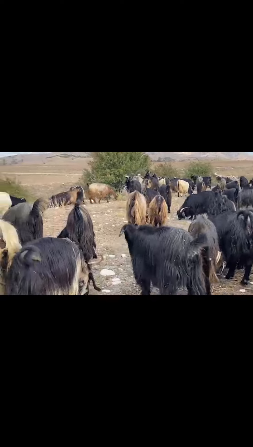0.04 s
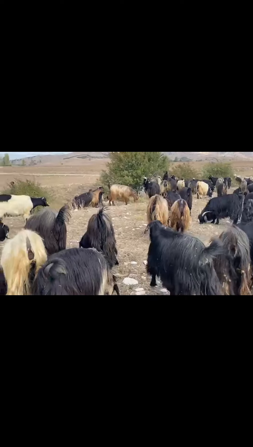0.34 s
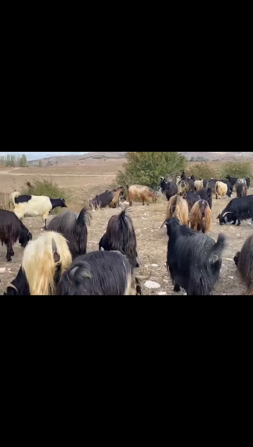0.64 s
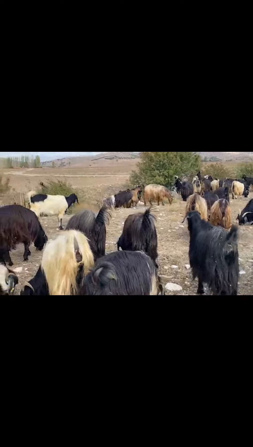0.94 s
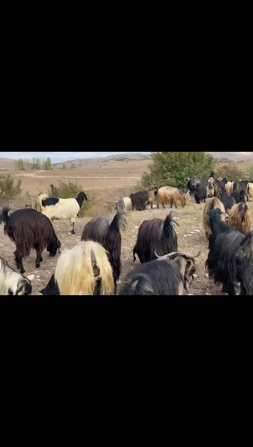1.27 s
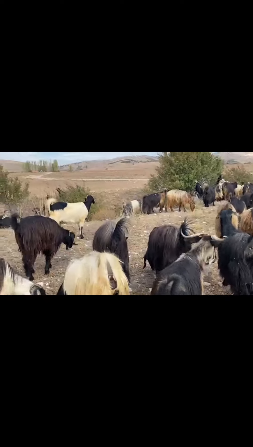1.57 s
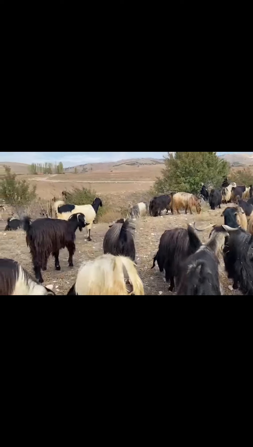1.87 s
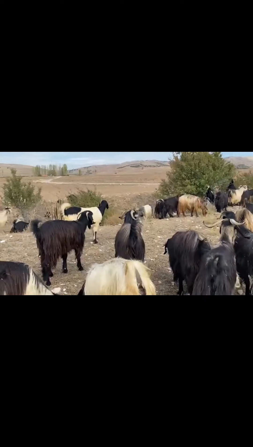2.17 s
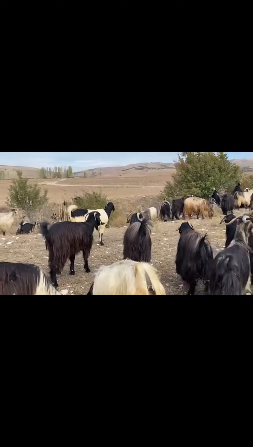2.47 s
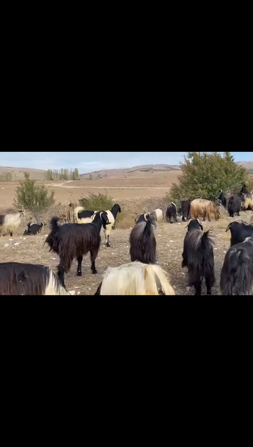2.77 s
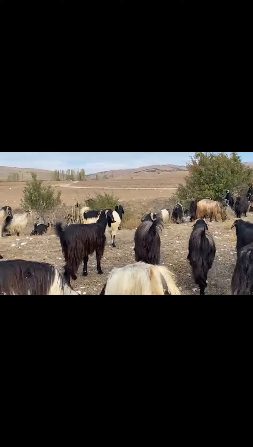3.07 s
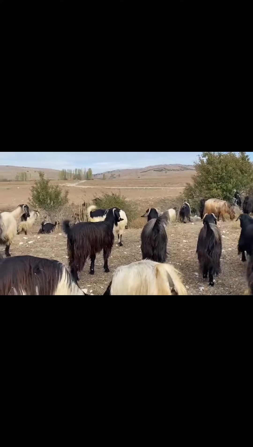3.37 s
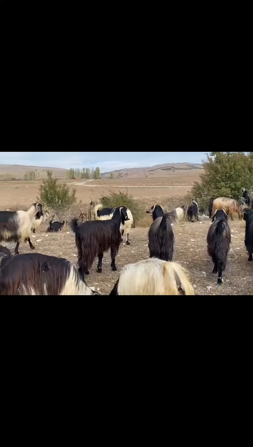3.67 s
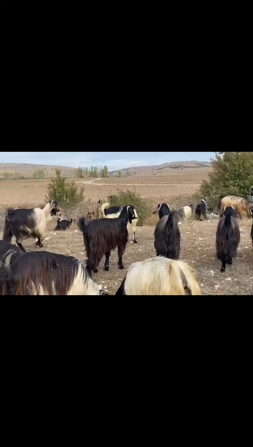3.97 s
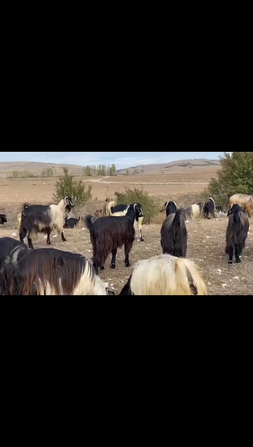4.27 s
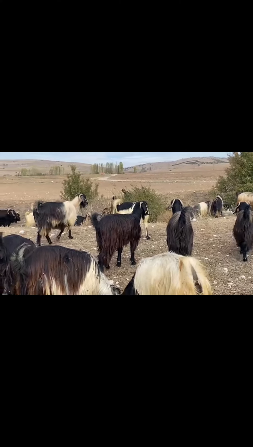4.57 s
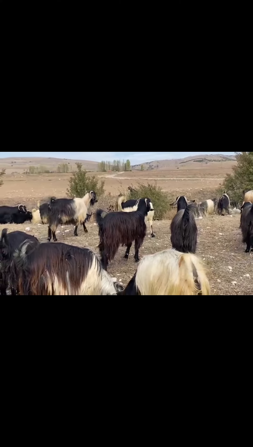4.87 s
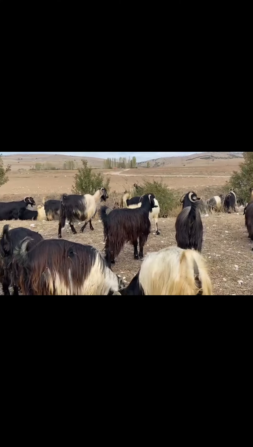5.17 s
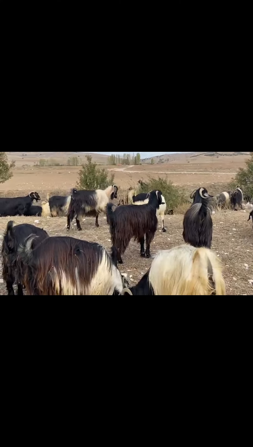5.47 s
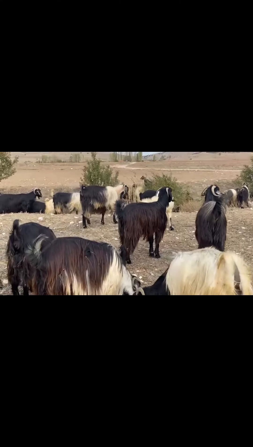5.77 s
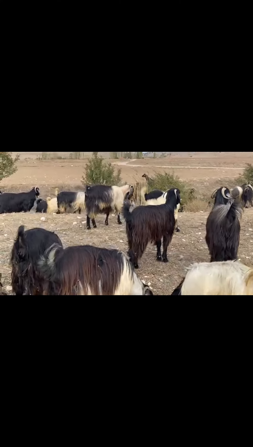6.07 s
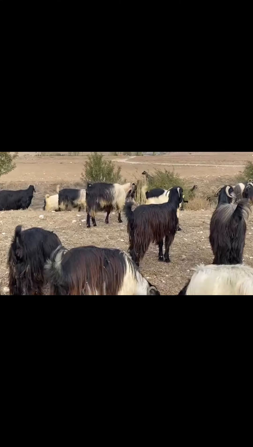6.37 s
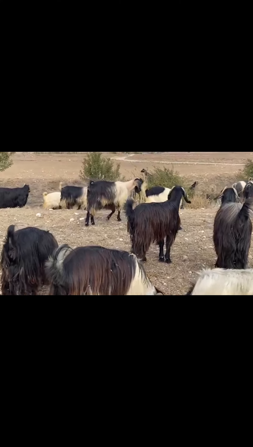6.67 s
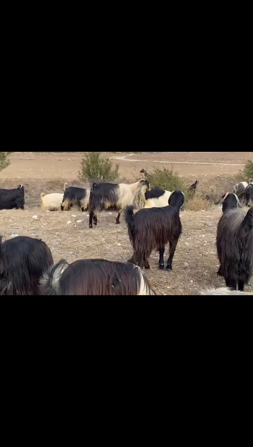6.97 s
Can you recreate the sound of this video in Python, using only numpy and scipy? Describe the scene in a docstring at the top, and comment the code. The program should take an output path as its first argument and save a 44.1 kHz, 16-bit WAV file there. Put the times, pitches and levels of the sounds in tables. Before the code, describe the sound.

From the first moment a goat's sheet-metal bell clonks close by, mostly to the left, each uneven strike a bright tick and a short hollow note that leaves a thin ring. Underneath, hooves thud softly on soil, twigs and stones crack, and legs drag through dry stalks. Low puffs of wind rumble on the microphone throughout, and small bells tinkle very faintly far to the right. Three faint pips come between about 2.4 and 3 seconds, with a sharp twig snap just before 3. After a strong clonk at about 3.3 seconds the bell thins to a few sparse strikes. Around 5.6 seconds one strong gust hits the microphone, together with the heaviest hoof thump and the loudest snap. From 5.8 seconds the bell picks up again, ending on a bright strike at about 7 seconds. The pasture is open and free of echo.

```python
"""Goats graze on dry, stony pasture. From the first moment a clapper clonks in the sheet-metal bell of a
walking goat, while hooves thud, snap twigs and crunch through stalks. Wind puffs on the microphone and
far bells tinkle. Faint pips come between 2 and 3 s, then the near bell thins out. Around 5.6 s one
strong gust hits, with the heaviest hoof and the loudest snap, and the bell picks up again to the end."""
import sys
import numpy as np
from scipy import signal
from scipy.fft import rfft, irfft, next_fast_len
from scipy.io import wavfile
from scipy.ndimage import uniform_filter1d, map_coordinates

SR = 44100
rng = np.random.default_rng(int(sys.argv[2]) if len(sys.argv) > 2 else 0)


def log_audio(samples):
    """Write samples as a 16-bit WAV file to the path given in sys.argv[1]."""
    # one column per channel
    frames = np.atleast_2d(samples).T
    # limit to full scale, then quantise
    limited = np.clip(frames, -1, 1)
    pcm = np.round(limited * 32767).astype(np.int16)
    wavfile.write(sys.argv[1], SR, pcm)


N = 313551

# Clapper hits; the spot struck sets how strongly each mode family rings. Each row: start in seconds,
# clonk t60 in seconds, pan in dB (plus is left), the twin's starting phase in radians, then levels in dB
# of families 0-9: clonk, hum, ring, ring's twin, shimmer, low shimmer, ting, clink, ping, sparkle.
CLAPPER_HITS = [(0.0, 0.25, 5, 3.5, -19, -33, -41.5, -47, -47, -48.5, -60, -37, -56, -32.5),
                (0.035, 0.21, -3, -2, -70, -70, -73, -75, -75, -75, -75, -33.5, -53, -60.5),
                (0.211, 0.4, 1.5, 1.2, -36, -32, -43.5, -46.5, -45.5, -73, -43.5, -59, -58, -60),
                (0.339, 0.25, -1.0, 0.5, -32.5, -41.5, -41, -54, -52, -49.5, -59, -54, -66, -51.5),
                (0.487, 0.34, 5.5, -1.35, -31.5, -46.5, -48, -52, -71, -56, -67, -63, -74, -58),
                (0.857, 0.63, 4, 2.5, -41, -36, -50, -55.5, -46, -48.5, -58, -47, -45.5, -53),
                (1.068, 0.25, 5.5, 2, -38.5, -47.5, -46, -50, -52, -55, -51, -72, -72, -62),
                (1.34, 0.55, 7, 1.4, -33.5, -45, -39, -47, -43, -72, -57, -49, -40.5, -44),
                (1.704, 0.25, 5, 0, -65, -47, -56, -62, -49.5, -52, -56, -49, -61, -57),
                (2.296, 0.49, 6, -1.6, -29.5, -58, -38.5, -47.5, -46, -56, -55, -47, -53, -47),
                (2.469, 0.23, 7.5, 0, -27, -58, -52.5, -58, -52, -67, -57, -49.5, -61, -55),
                (2.659, 0.54, 3.5, -2.5, -38, -60.5, -52, -56, -63, -62, -72, -58, -72, -63),
                (3.091, 0.32, 11.0, 3.5, -26.5, -59, -46, -58, -62.5, -79, -72, -71, -71, -71),
                (3.235, 0.38, 8.0, -2, -33.5, -60, -62, -63, -72, -72, -53, -64, -72, -65),
                (3.346, 0.34, 8, -2, -19.5, -36, -52, -54.5, -62.5, -61, -63, -50, -72, -58),
                (4.437, 0.33, 7, -2.5, -55.5, -40.5, -52.5, -68, -54.5, -81, -71, -70, -73, -64),
                (5.027, 0.41, 25, 3.5, -31.5, -66, -60, -76, -69, -79, -72, -68, -62, -65),
                (5.403, 0.7, 15, -1, -51, -49, -65, -76, -76, -76, -75, -72, -78, -77),
                (5.815, 0.37, 7.5, -2.6, -38, -42, -53.5, -67, -69, -61, -55, -58, -63, -53),
                (6.152, 0.47, 10.0, 2.2, -39, -54, -61.5, -63, -58, -67, -56, -60, -64, -60),
                (6.267, 0.55, 5.5, -2, -35, -40.5, -47, -61, -65, -55.5, -59.5, -62, -57, -57),
                (6.666, 0.46, 8, -1.5, -44.5, -40, -55.5, -62, -50, -51, -43, -47, -54, -49),
                (7.048, 0.23, 1, 0, -25.5, -46, -41, -47.5, -43, -47.5, -41, -32.5, -50.5, -38)]
# Modes of the bell wall; close pairs beat as they fade.
# Each row: family number, pitch in Hz, level trim in dB, t60 in seconds, pan in dB.
WALL_MODES = [(1, 1555, 0, 1.6, 1.5), (2, 3378, 0, 3.3, 1), (3, 3385.6, 0, 3.3, -1), (4, 6022, 0, 1.35, 0),
              (5, 5936, 0, 1.35, -3), (6, 6487, 0, .3, 4), (7, 7272, 1, .24, -1), (7, 6932, -7, .3, -1),
              (8, 7704, -1, .36, 10), (8, 10078, -1, .3, -8), (9, 7900, 1, .19, 1), (9, 10466, -5, .25, -7),
              (9, 9430, -3, .33, -8)]
HUM, TWIN = 1, 3   # family numbers
# The bell sways on the neck. Each row: time in seconds, clonk pitch in Hz, left-side lag in radians.
BELL_SWAY = [(0, 1493, 0.71), (.5, 1489, 1), (1.4, 1490, 0.86), (2.4, 1484, 0.4), (3.2, 1485, 0.67),
             (4.44, 1490, 1.1), (5.03, 1486, 3), (5.8, 1492, 3.8), (6.2, 1493, 1.17), (6.67, 1487, 3.85),
             (7.051, 1498, 1.93)]
# The hum swells and dips as the bell turns. Each row: time in seconds, gain in dB.
HUM_RIDE = [(.5, -3.5), (.87, -6.5), (1, 2.5), (1.1, -1.5), (1.18, -7), (1.28, 4), (1.45, 13.5), (1.87, 3),
            (2.06, 7.5), (2.2, -10), (2.3, 10.5), (2.73, -1), (2.88, 17), (3.62, -7), (3.98, -7.5),
            (4.2, 0.5), (4.75, -14), (5.7, -3.5), (6.67, -4), (6.95, 5.5)]
# Hooves on soil and stone.
# Each row: start in seconds, level in dB, thump pitch in Hz, grit against the thump in dB.
HOOF_FALLS = [(.404, -36, 181, -34), (.619, -47, 396, -4), (1.105, -37.5, 172, -6.5),
              (1.708, -40.5, 340, -7.5), (2.042, -40, 179, -18), (2.604, -44.5, 272, -10),
              (3.59, -45, 149.9, -11.5), (3.916, -37, 185, -22.5), (4.968, -45.5, 450, -6),
              (5.655, -25.5, 146, -42), (6.032, -44, 238, -20)]
# Twigs and stones cracking underfoot. Each row: start in seconds, relative peak in dB, tone in Hz.
CRACKS = [(.623, -36, 1900), (.841, -31, 4000), (1.025, -36.5, 850), (1.779, -33.5, 2600),
          (2.105, -35.5, 6000), (2.606, -42, 3000), (2.866, -33.5, 5000), (2.953, -22.5, 4470),
          (3.484, -38, 4500), (3.809, -36, 7600), (3.988, -44, 5200), (4.352, -41, 3850),
          (4.837, -46, 1700), (4.935, -34.5, 1360), (4.965, -37, 2640), (5.217, -39, 4600),
          (5.326, -35.5, 6200), (5.498, -31, 3630), (5.572, -28.5, 6750), (5.733, -33, 940),
          (5.737, -21, 9900), (5.893, -36, 900), (5.978, -38, 1000), (6.330, -37.5, 2200),
          (6.645, -29, 8000), (6.9, -31, 3740)]
# A nearby leg drags through stubble.
# Each row: crest time in seconds, fade in seconds, relative stalk and soil levels in dB.
LEG_DRAGS = [(0, 0.017, -53, -48.5), (.32, 0.032, -57, -68), (.55, 0.12, -70, -63),
             (1.02, 0.046, -58.5, -59), (1.12, 0.078, -66, -58.5), (1.5, 0.027, -56, -73),
             (1.72, 0.091, -58, -56), (2.6, 0.027, -56, -68), (3.81, 0.03, -60.5, -60.5),
             (4.755, 0.039, -54.5, -52.5), (4.97, 0.011, -61, -51.5), (5.59, 0.097, -61, -60),
             (6.615, 0.035, -51.5, -59.5), (6.76, 0.16, -62.5, -59.5), (7.06, 0.039, -61, -78)]
# The herd's bed of rustle. Each row: time in seconds, relative stalk and soil levels in dB.
HERD_BED = [(0, -63.5, -65.5), (1.1, -61.5, -62), (2.4, -62, -64.5), (3.3, -65, -66), (4.5, -65, -66),
            (5.5, -64.5, -63.5), (6.3, -65.5, -63), (7.1, -60.5, -66)]
# EQ curves for crisp stalks and dull soil. Each row: frequency in Hz, gain in dB.
STALK_EQ = [(900, -18), (1500, -8.5), (2100, 0.5), (3000, -2), (4800, 0), (7000, 0.5), (9000, -0.5),
            (11950, -2)]
SOIL_EQ = [(180, -2.5), (380, 1.5), (750, -5.5), (1200, -7.5), (2000, -11.5), (3500, -38)]
# Wind puffs on the microphone.
# Each row: crest time in seconds, fade in seconds, relative rumble and turbulence levels in dB.
WIND_PUFFS = [(.46, 0.035, -40, -58), (.7, 0.053, -46.5, -62), (.825, 0.028, -36.5, -50),
              (1.0, 0.066, -38.5, -49.5), (1.255, 0.033, -43.5, -54), (1.38, 0.038, -44.5, -60),
              (1.81, 0.11, -52, -56.5), (2.05, 0.05, -43.5, -47.5), (2.87, 0.049, -47, -61),
              (3.14, 0.069, -46, -65), (3.59, 0.095, -42, -60), (3.74, 0.053, -52, -51.5),
              (4.49, 0.084, -45.5, -59.5), (4.72, 0.073, -39, -47), (5.13, 0.073, -41.5, -68),
              (5.49, 0.1, -31, -49.5), (5.655, 0.1, -27.5, -34.5), (6.03, 0.031, -40, -51.5),
              (6.47, 0.054, -43, -52.5), (6.61, 0.081, -44.5, -47.5)]
# The breeze between puffs. Each row: time in seconds, relative rumble and turbulence levels in dB.
BREEZE_BED = [(0, -65, -61.5), (.3, -59.5, -63), (1.1, -53.5, -61), (1.7, -53.5, -62), (2.28, -60, -76),
              (2.8, -61, -73), (3.4, -54, -61.5), (4.2, -53, -64.5), (5.3, -54.5, -61), (5.9, -47, -53),
              (6.12, -59.5, -64), (6.36, -63.5, -69), (6.8, -53.5, -58.5)]
# EQ curves for large and small eddies. Each row: frequency in Hz, gain in dB.
RUMBLE_EQ = [(15, -37), (28, -24), (42, -4), (68, 0.5), (100, -3.5), (140, -14), (220, -42)]
TURBULENCE_EQ = [(80, -15.5), (130, -4.5), (180, -5), (235, -9.5), (330, -18), (800, -54)]
# Distant pips. Each entry is a start in seconds.
PIP_STARTS = [2.922, 2.4, 3.035]
# Sound from below reaches the two microphone ports out of step.
# Each row: frequency in Hz, phase shift of the left port in radians.
PORT_SHIFT = [(7500, 0), (7950, 0), (8400, -np.pi), (9550, -np.pi), (10050, -5), (10450, -2 * np.pi)]


def goat_bell(clonk_rise_s=.0019, rise_cycles=3, detune_hz=.29, aim_db=3, graze_s=.06, rebound_s=.11):
    """Each clapper hit knocks, sounds a short clonk in the bell's air and leaves the wall ringing."""
    clonk, knocks = np.zeros((2, 2, N))
    walls = np.zeros((len(WALL_MODES), 2, N))
    starts = [hit[0] for hit in CLAPPER_HITS]
    pauses = np.diff(starts, prepend=-1)
    sway_s, sway_hz, sway_lag = np.transpose(BELL_SWAY)
    for (start, clonk_t60, pan_db, twin_phase, *family_db), pause in zip(CLAPPER_HITS, pauses):
        # the next hit chokes the ring, unless it is only a quick graze
        free_s = min([later for later in starts if later > start + graze_s] + [N / SR]) - start
        clonk_hz = np.interp(start, sway_s, sway_hz)
        lag = np.interp(start, sway_s, sway_lag)
        air_tone = partial(clonk_hz, clonk_t60, free_s, clonk_rise_s, lag)
        add(clonk, start, from_db(family_db[0]) * panned(pan_db) * air_tone)
        for wall, (family, hz, trim_db, t60, side_db) in zip(walls, WALL_MODES):
            scatter_db, detune, aim, spot = rng.standard_normal(4)
            is_hum = family == HUM
            gain = from_db(family_db[round(family)] + trim_db + scatter_db)
            # the hum follows the clonk's pan; overtones beam anywhere
            pan = panned(side_db + (pan_db if is_hum else aim_db * aim))
            phase = (family == TWIN) * twin_phase + .18 * spot
            tone = partial(hz + detune_hz * detune, t60, free_s, rise_cycles / hz, is_hum * lag, phase)
            add(wall, start, gain * pan * tone)
        force = np.linalg.norm(from_db(family_db[2:]))
        force *= 1 - np.exp(-pause / rebound_s)   # a quick rebound lands softly
        add(knocks, start, from_db(-4) * force * clapper_knock())
    return clonk + through_ports(knocks + bell_turning(walls))


def partial(hz, t60, free_s, rise_s, lag=0., phase=0., choke_s=.011):
    """One bell mode swells, rings freely until free_s, then is choked."""
    t = np.arange(int((free_s + .03) * SR)) / SR
    attack = 1 - np.exp(-t / rise_s)
    decay = from_db(-60 * t / t60)
    choke = np.exp(-np.maximum(t - free_s, 0) / choke_s)
    return attack * decay * choke * np.sin(2 * np.pi * hz * t + phase + np.array([[-lag], [0]]))


def clapper_knock(decay_s=.0038, clack_hz=2400):
    """The clapper's contact: a hard, bright tick and a short clack of sheet metal."""
    t = np.arange(SR // 30) / SR
    decay = np.exp(-t / decay_s)
    tick_noise, clack_noise = rng.standard_normal((2, len(t)))
    tick = band(tick_noise * decay, 940, 11000, order=1)
    clack = rms_one(band(clack_noise, clack_hz / 1.7, clack_hz * 1.52)) * decay
    return tick + from_db(-4) * clack


def bell_turning(walls, depth_db_per_khz=.6469, lobe_cycles=220):
    """Each mode's lobes sweep past as the bell turns: higher overtones flutter faster and deeper."""
    ringing = 0
    for wall, (family, hz, *_) in zip(walls, WALL_MODES):
        if family == HUM:
            lobe_db, = in_time(HUM_RIDE)
        elif family != TWIN:   # the twin shares the flutter of the ring before it
            lobe_db = depth_db_per_khz * hz / 1000 * drift(hz / lobe_cycles)
        ringing = ringing + wall * from_db(lobe_db)
    return ringing


def hooves(attack_s=.00053, decay_cycles=2.23, grit_s=.018):
    """A hoof gives a dead thump, lower and longer on soft soil, and a puff of grit."""
    out, t = np.zeros(N), np.arange(SR // 8) / SR
    for start, db, hz, grit_db in HOOF_FALLS:
        envelope = (1 - np.exp(-t / attack_s)) * np.exp(-t * hz / decay_cycles)
        thump = envelope * np.sin(2 * np.pi * hz * t)
        grit = rms_one(band(rng.standard_normal(len(t)), 230, 1020)) * np.exp(-t / grit_s)
        add(out, start, from_db(db) * (thump + from_db(grit_db) * grit))
    return out


def snaps(gain_db=1, tear_db=-13, tear_s=.0007, splinter_db=-31, splinter_s=.011):
    """One clean break, a brief tearing of fibres, then a faint tail of splinters."""
    out, t = np.zeros(N), np.arange(SR // 20) / SR
    clean_break = 2 * (t == 0)
    tail = from_db(tear_db) * np.exp(-t / tear_s) + from_db(splinter_db) * np.exp(-t / splinter_s)
    for start, db, hz in CRACKS:
        force = clean_break + tail * rng.standard_normal(len(t))
        body = band(force, hz / 1.4, hz * 1.15, order=1)
        crack = band(body, 350, 11900)
        add(out, start, from_db(db + gain_db) * crack / np.abs(crack).max())
    return out


def trampling(stalk_gain_db=7, soil_gain_db=2, edges_hz=(900, 2600, 4600, 7200, 11900)):
    """Thick and thin stalks crackle in their own registers over the herd's rustle; soil scuffs below."""
    drag_power = swell_power(LEG_DRAGS, rise_share=.59)
    stalk_level, soil_level = np.sqrt(drag_power + from_db(in_time(HERD_BED)) ** 2)
    crackle = sum(band(crunch(per_s=1200, size_db=3, clump_db=3.5), low, high)
                  for low, high in zip(edges_hz, edges_hz[1:]))
    rustle = rng.standard_normal(N) * from_db(2 * drift(60))
    stalks = stalk_level * coloured(crackle + from_db(-3) * rustle, STALK_EQ)
    grit = crunch(per_s=600, size_db=3.7, clump_db=3)
    soil = soil_level * coloured(grit + from_db(-4) * wide_noise(side_db=.5), SOIL_EQ)
    return from_db(stalk_gain_db) * through_ports(stalks) + from_db(soil_gain_db) * soil


def crunch(per_s, size_db, clump_db):
    """Many tiny breaks of uneven size, louder in clumps."""
    breaks = rng.random(N) < per_s / SR
    sizes = from_db(size_db * np.minimum(rng.exponential(1, N), 4.5))
    polarity = rng.choice([-1, 1], N)
    return rms_one(breaks * sizes * polarity * from_db(clump_db * drift(70)))


def wind(rumble_gain_db=.5, waver_db=3.5):
    """Puffs ride a wavering breeze. Large eddies press on both ports alike, small ones spread wide."""
    breeze = from_db(np.array(in_time(BREEZE_BED)) + waver_db * drift(12))
    rumble_level, turbulence_level = np.sqrt(swell_power(WIND_PUFFS, rise_share=.83) + breeze ** 2)
    rumble = rumble_level * eddies(RUMBLE_EQ, side_db=-13.5, steady_s=.052)
    turbulence = turbulence_level * eddies(TURBULENCE_EQ, side_db=-3, steady_s=.064)
    return from_db(rumble_gain_db) * rumble + turbulence


def eddies(eq, side_db, steady_s):
    """Swirls of air pressure, levelled so that the wind alone shapes their swell."""
    swirl = coloured(wide_noise(side_db), eq)
    power = uniform_filter1d(np.mean(swirl ** 2, axis=0), int(steady_s * SR))
    return swirl / np.sqrt(power + 1e-6)


def far_bells(level_db=-64, t60=.74, count=22):
    """Small bells deeper in the herd tinkle at random, off to the right."""
    out = np.zeros((2, N))
    for when, pitch, softness in rng.random((count, 3)):
        tone = partial(1920 + 220 * pitch, t60, free_s=t60, rise_s=.0022)
        add(out, when * N / SR, from_db(level_db - 2.1 * softness) * panned(-20) * tone)
    return out


def pips(level_db=-54, pitch_hz=2020, length_s=.015):
    """Faint distant pips, perhaps a bird: each a soft-edged blip of sine."""
    out, t = np.zeros(N), np.arange(int(length_s * SR)) / SR
    for start in PIP_STARTS:
        add(out, start, np.hanning(len(t)) * np.sin(2 * np.pi * pitch_hz * t))
    return from_db(level_db) * out


def through_ports(x):
    """In the high treble the two microphone ports hear nearby sounds out of step."""
    size = next_fast_len(N + 4096)
    phase = np.interp(np.fft.rfftfreq(size, 1 / SR), *np.transpose(PORT_SHIFT))
    left_shift = np.exp(1j * phase * np.array([[1], [0]]))
    return irfft(rfft(x, size) * left_shift, size)[:, :N]


def swell_power(rows, rise_share, steepness=1.2):
    """Round-topped swells, one power curve per level column; the rise lasts rise_share of the fade."""
    power = 0
    for crest_s, fade_s, *levels_db in rows:
        t = np.arange(N) / SR - crest_s
        from_crest = np.maximum(t, -t / rise_share) / fade_s
        envelope = np.exp(-np.minimum(from_crest ** steepness, 20))
        power = power + np.outer(from_db(levels_db), envelope) ** 2
    return power


def drift(per_s):
    """A smooth random wobble of spread near 1, through per_s points a second."""
    knots = rng.standard_normal(int(N / SR * per_s) + 4)
    fine = map_coordinates(knots, [np.arange(len(knots) * 10) / 10], order=2, mode="nearest")
    return np.interp(np.arange(N) / SR * per_s * 10, np.arange(len(fine)), fine)


def coloured(x, eq):
    """Shape x with an EQ curve, at unit power."""
    hz, db = np.transpose(eq)
    size = next_fast_len(N + 4096)
    log_hz = np.log(np.fft.rfftfreq(size, 1 / SR) + 1)
    gain = from_db(np.interp(log_hz, np.log(hz), db, left=-80, right=-80))
    return rms_one(irfft(rfft(x, size) * gain, size)[..., :N])


def band(x, low_hz, high_hz, order=2):
    """Causal band-pass."""
    sos = signal.butter(order, [low_hz, min(high_hz, .45 * SR)], "band", fs=SR, output="sos")
    return signal.sosfilt(sos, x)


def wide_noise(side_db):
    """White stereo noise whose side level sets its width."""
    mid, side = rng.standard_normal((2, N))
    return mid + from_db(side_db) * side * np.array([[1], [-1]])


def panned(db):
    """Left and right gains of unit mean power; plus is left."""
    return rms_one(from_db([[db / 2], [-db / 2]]))


def in_time(rows):
    """Draw each column of timed breakpoints as an automation curve."""
    times, *columns = np.transpose(rows)
    return [np.interp(np.arange(N) / SR, times, column) for column in columns]


def add(out, start_s, sound):
    """Mix a sound in at its cue."""
    at = int(np.clip(round(start_s * SR), 0, N - 1))
    out[..., at:at + sound.shape[-1]] += sound[..., :N - at]


def from_db(db):
    """Decibels to gain."""
    return 10 ** (np.asarray(db) / 20)


def rms_one(x):
    """Scale to unit power."""
    return x / np.sqrt(np.mean(x ** 2) + 1e-20)


def scene():
    """Open ground: every layer arrives without reverb."""
    return goat_bell() + hooves() + through_ports(snaps()) + trampling() + wind() + far_bells() + pips()


def record(dry):
    """A steep low-pass takes off the top above 11.9 kHz."""
    return signal.sosfilt(signal.ellip(10, .2, 70, 11900, fs=SR, output="sos"), dry)


dry = scene()
out = record(dry)
log_audio(out)
```